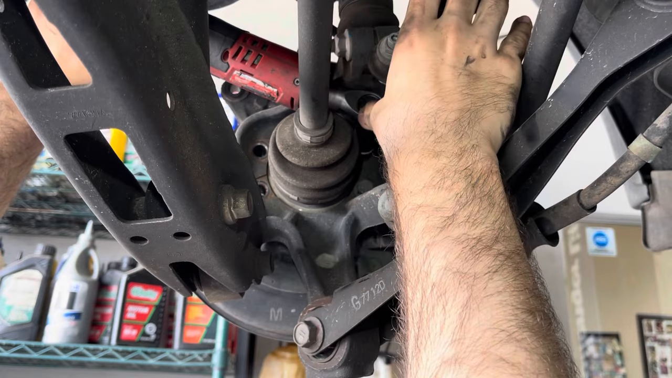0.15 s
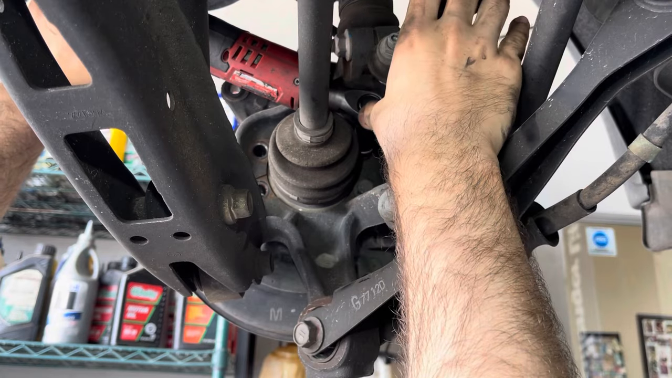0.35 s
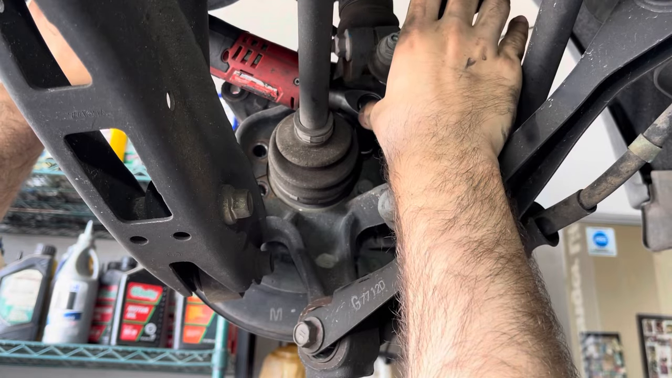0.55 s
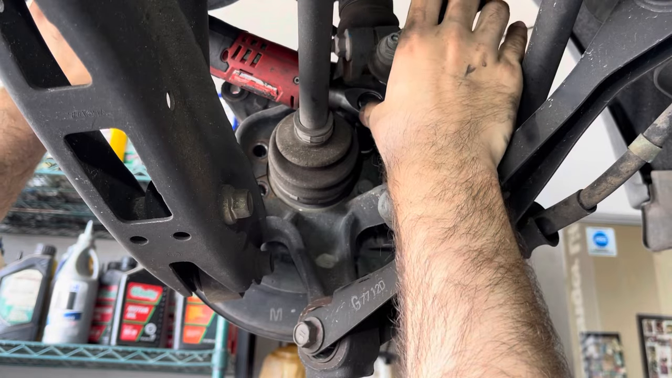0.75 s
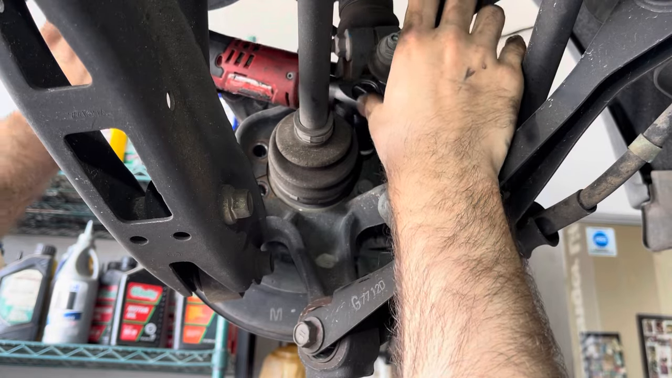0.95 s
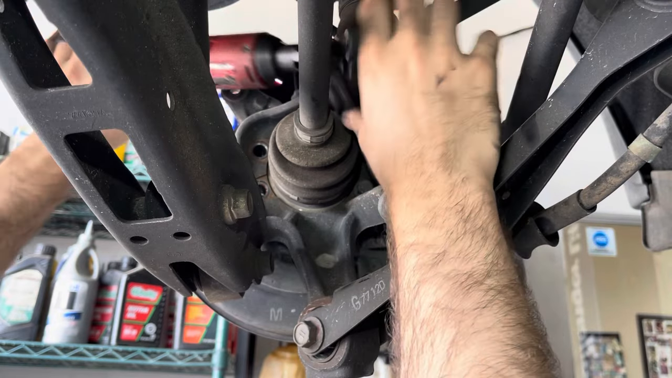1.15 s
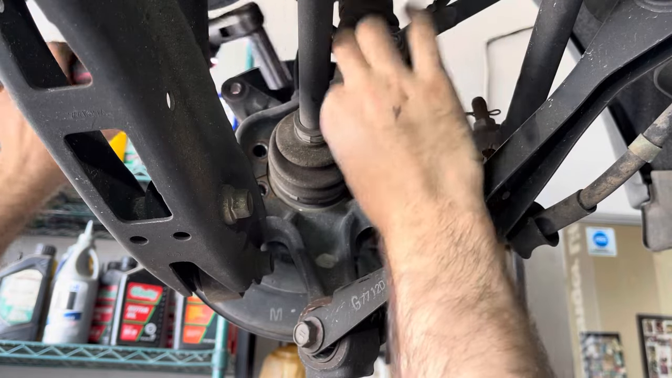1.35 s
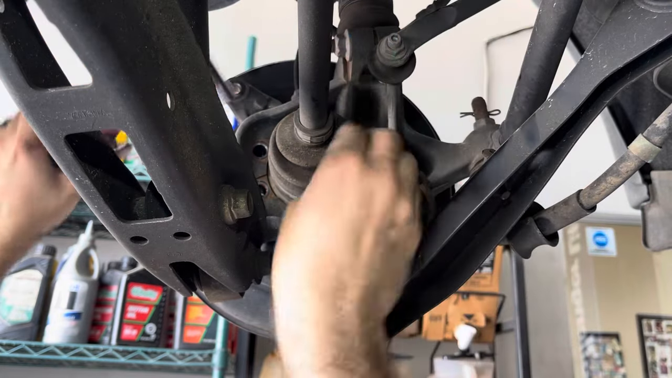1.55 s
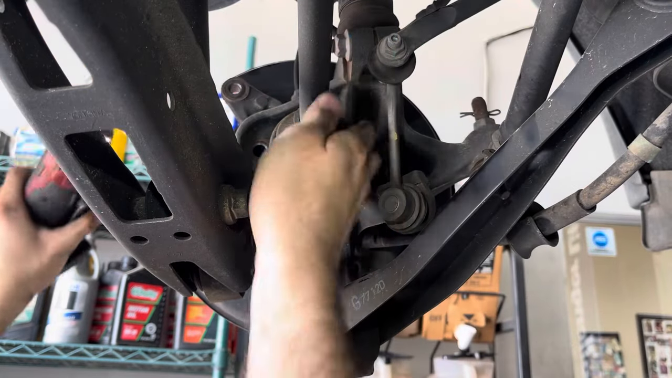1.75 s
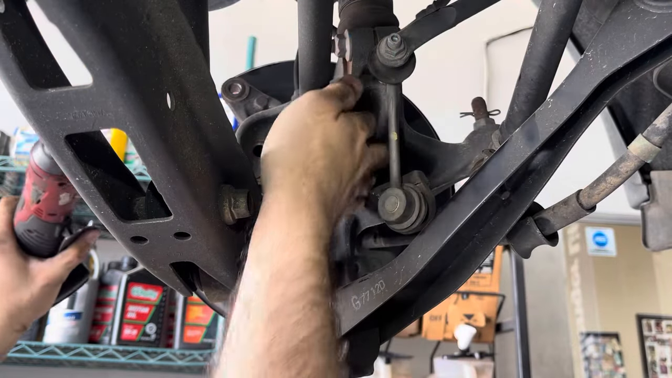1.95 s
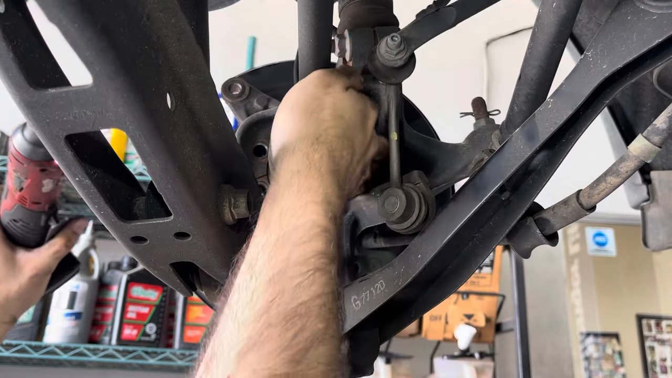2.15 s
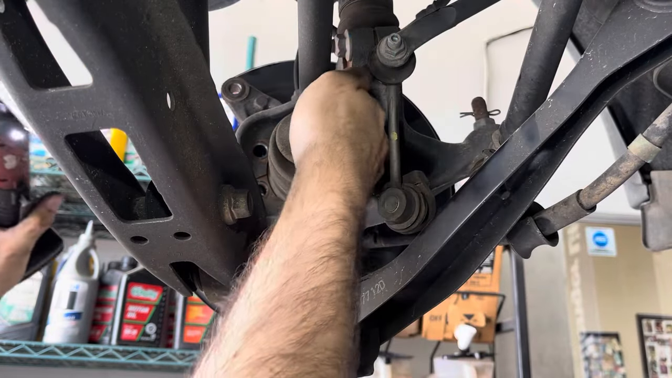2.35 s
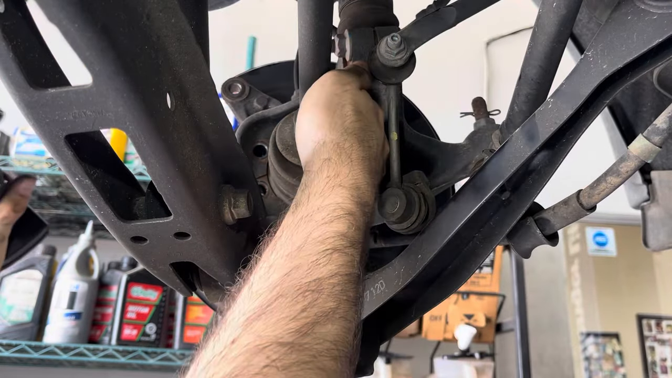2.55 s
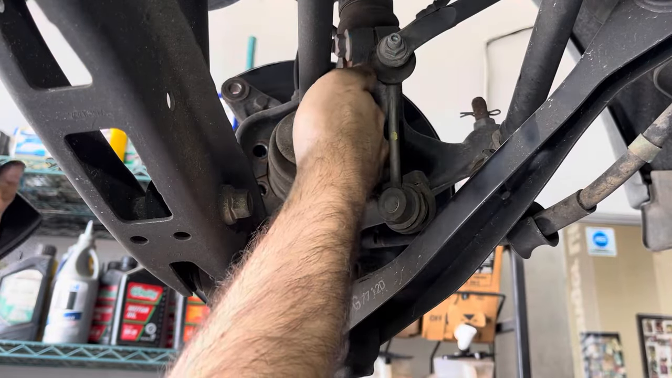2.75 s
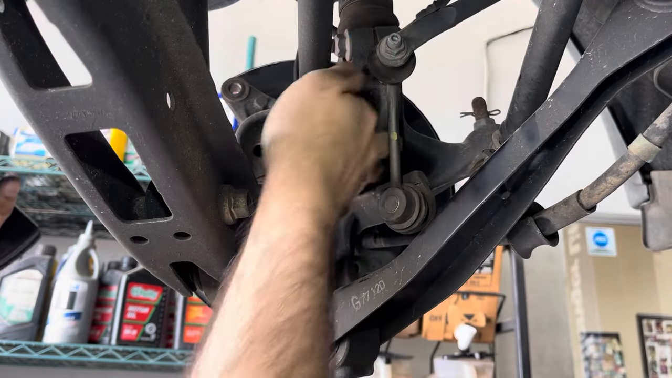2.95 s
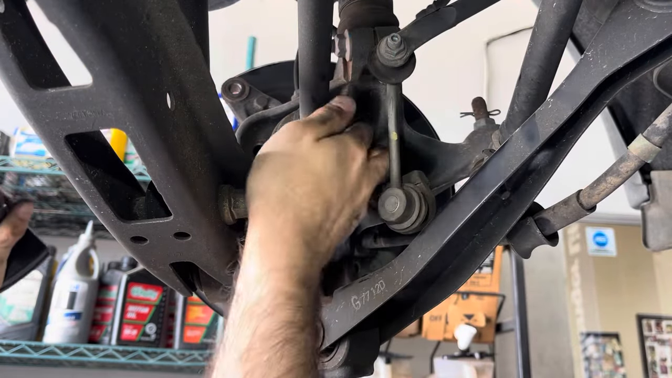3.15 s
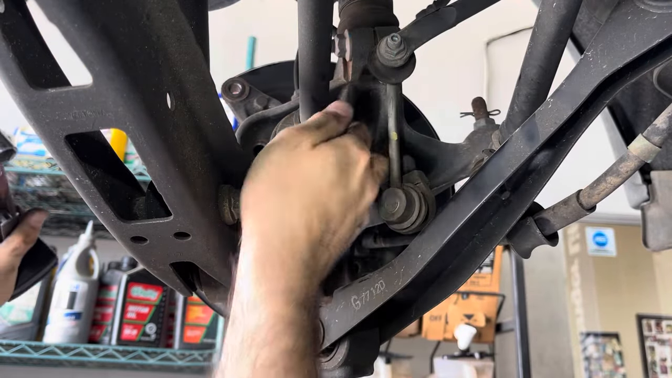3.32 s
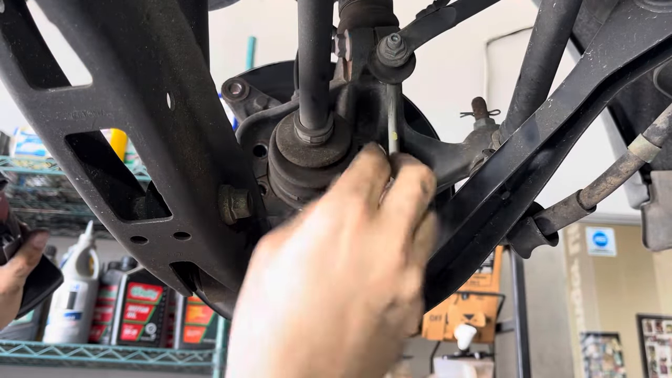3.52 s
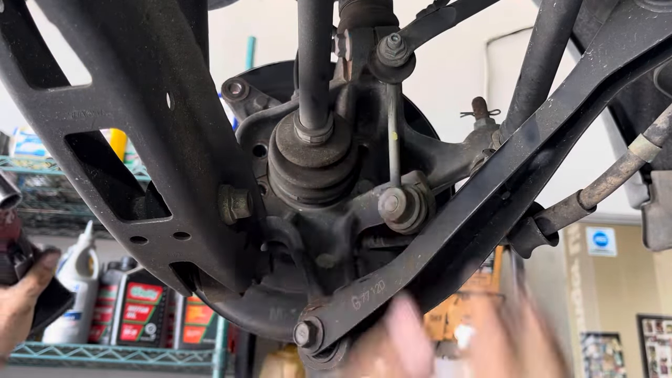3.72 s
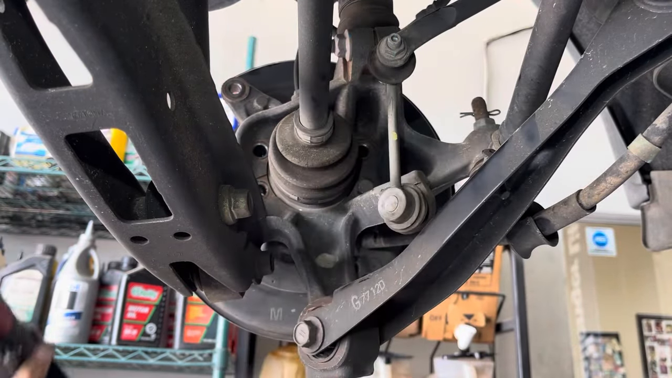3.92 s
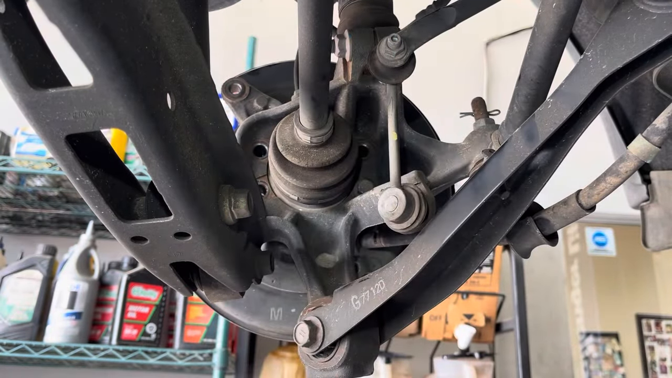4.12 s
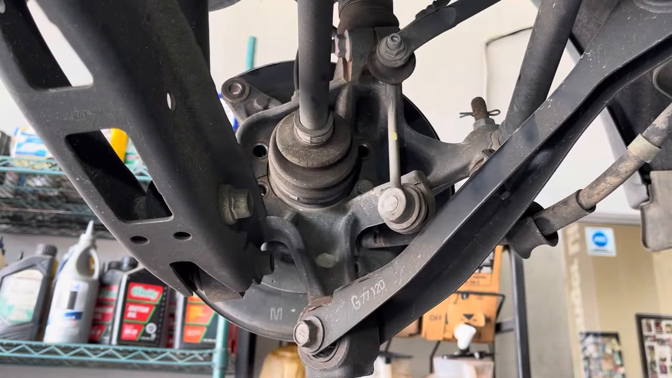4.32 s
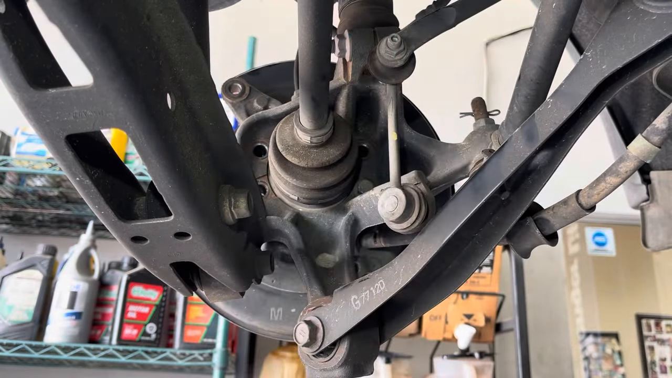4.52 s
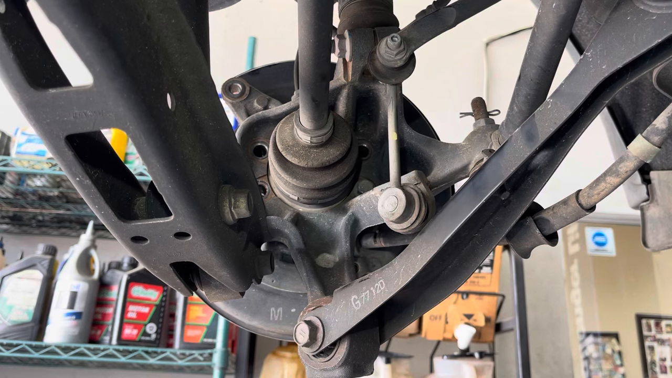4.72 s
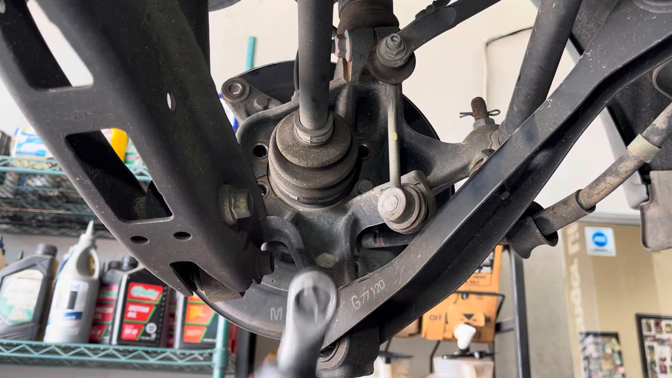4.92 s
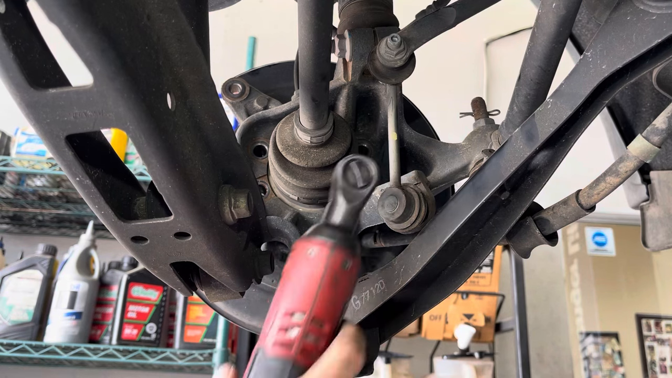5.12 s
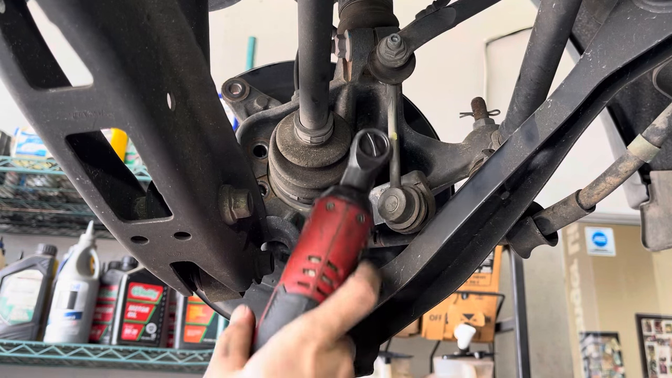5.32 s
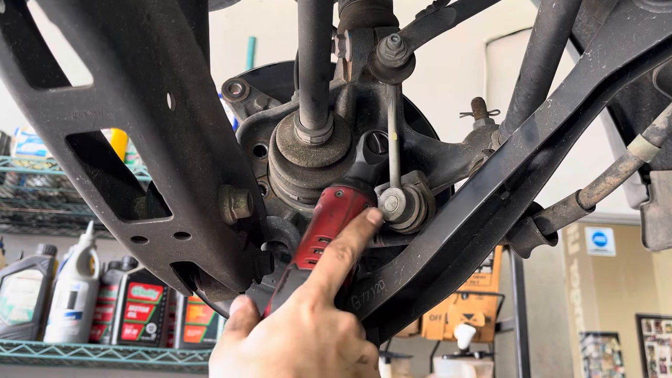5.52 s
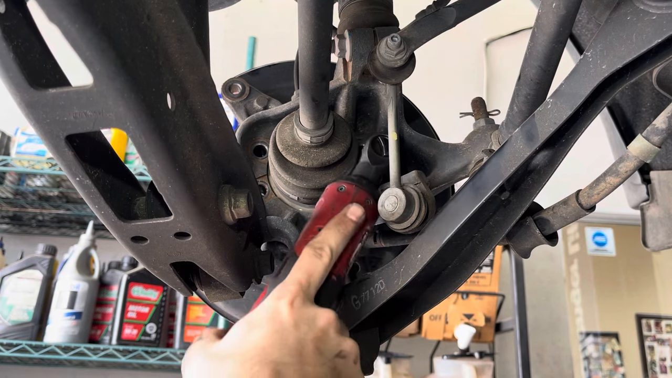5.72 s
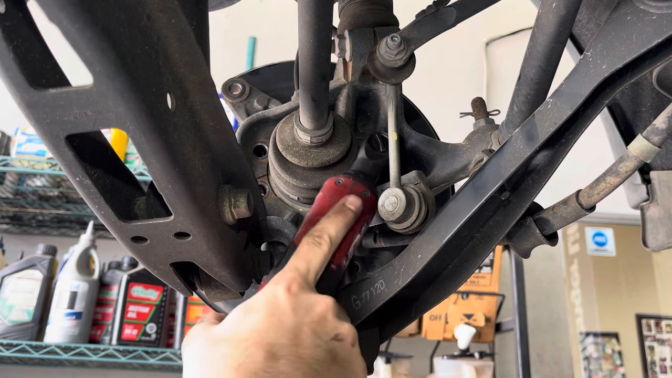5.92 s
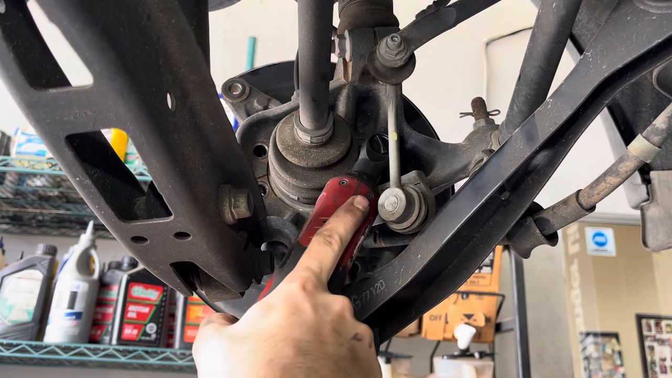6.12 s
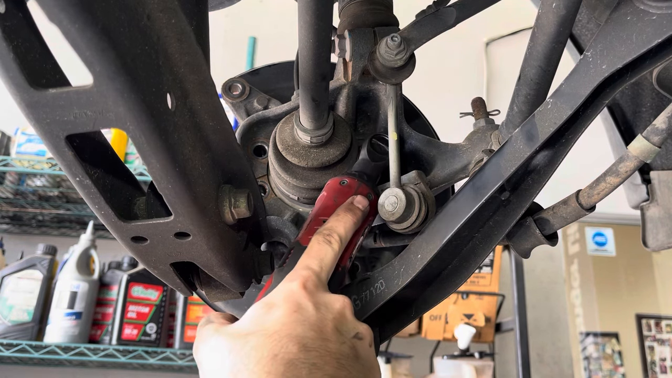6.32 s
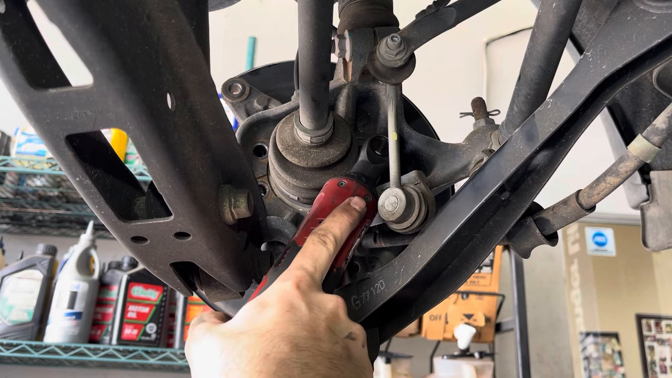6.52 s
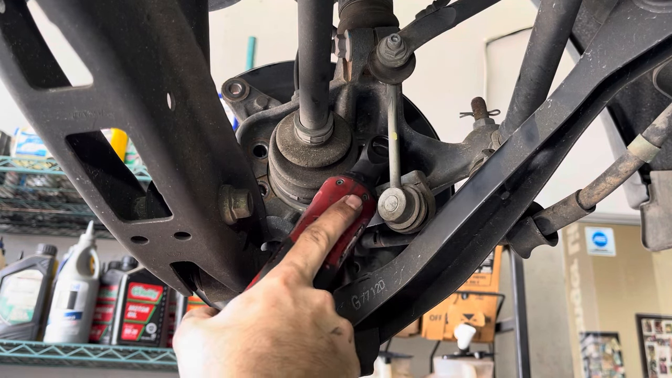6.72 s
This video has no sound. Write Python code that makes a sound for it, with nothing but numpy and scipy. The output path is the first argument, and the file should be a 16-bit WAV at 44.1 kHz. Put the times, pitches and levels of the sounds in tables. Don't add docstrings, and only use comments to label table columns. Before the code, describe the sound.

A nearby stereo microphone catches a power ratchet's bright, gritty buzz, released early and slowing tick by tick. In the quiet, small metal parts click, a bolt rings shortly, a bracket is knocked and a loose socket sings piercingly high in swells. The sound ducks for an instant; dull tool knocks come next, then the ratchet starts abruptly and runs to the end over low traffic and room hum.

```python
import sys
import numpy as np
from scipy import signal
from scipy.fft import rfft, irfft, next_fast_len
from scipy.io import wavfile
from scipy.ndimage import uniform_filter1d

SR = 44100
rng = np.random.default_rng(int(sys.argv[2]) if len(sys.argv) > 2 else 0)


def field_ratio(decibels):
    return 10 ** (np.asarray(decibels, dtype=float) / 20)


def inscribe(sig):
    pcm = np.round(np.clip(np.atleast_2d(sig).T, -1, 1) * 32767)
    wavfile.write(sys.argv[1], SR, pcm.astype(np.int16))


N = 298557

# [f/Hz, level per Hz/dB]
GEAR_SPECTRUM = [(150, -41), (250, -9), (483, -15), (527, -5), (575, -10), (934, -9.5), (1370, -13),
                 (3550, -10), (6740, -12), (9050, -1), (10200, 6.5), (11500, -1), (12800, -1.5),
                 (13700, -22.5), (15800, -19)]
# [f/Hz, width/Hz, level/dB]
HOUSING_MODES = [(947, 70, -8), (1780, 67, -6), (2298, 38, -13), (3490, 56, -6), (4025, 37, -4.5),
                 (4220, 68, -4.5), (5560, 180, -2), (9240, 420, -1)]
# [multiple of the stroke rate, level against the gear noise/dB]
MOTOR_HUM = [(1, -18.5), (1.52, -15), (2.04, -22.5), (2.97, -20), (7.05, -19.5)]
# [f/Hz, left minus right/dB]
TOOL_LEAN = [(60, 4), (180, 7), (550, -9.5), (1650, -4.5), (4970, -6), (15000, 2.5)]
# [f/Hz, likeness 0-1]
TOOL_LIKENESS = [(200, .5), (1000, .6), (4000, 0.51), (10000, 0.6)]

# [f/Hz, level per Hz/dB]
STREET_SPECTRUM = [(15, -43), (25, -15), (97, 0.5), (160, -10.5), (244, -21.5), (325, -14), (380, -26.5),
                   (563, -23.5), (925, -19.5), (1980, -32), (3330, -50.5), (5780, -52), (9500, -45.5),
                   (12000, -64), (13000, -78.5)]
# [f/Hz, left minus right/dB]
STREET_LEAN = [(60, -2), (240, -0.5), (950, -4), (3770, -8.5), (15000, 2.5)]
# [f/Hz, likeness 0-1]
STREET_LIKENESS = [(40, 0.44), (200, 0.18), (1000, 0.16), (6000, .2)]
# [t/s, rumble level/dB]
TRAFFIC = [(0, -40), (.8, -46), (1.3, -41), (1.8, -43.5), (3.05, -44), (3.5, -43.5), (4.2, -43),
           (4.7, -50.5), (4.85, -41.5), (5.37, -38), (6.3, -39.5), (6.77, -48.5)]
# [f/Hz, width/Hz, level/dB]
ROOM_HUMS = [(58, 5.1, -51), (78.4, 6.7, -54), (107.6, 11, -48.5), (117.94, 5.04, -51.5),
             (221.3, 7.8, -63.5), (288.6, 6, -60)]
# [start t/s, length/s, f/Hz, sag/Hz per s, level/dB]
ENGINE_NOTES = [(.98, .9, 333.7, 11, -56), (2.27, 0.42, 159.3, 2, -47), (2.98, 1.11, 139.9, 4, -44.5),
                (4.18, 0.454, 134, .5, -51.5), (4.85, 1.82, 135.8, 1.7, -42.5)]

STROKE_RING_DB = [-19.5, -21, -11.5, -11, -21.5, -17.5, -14, -21, -15, -15, -22, -33, -28.5, -24, -23.5,
                  -30.5]
# [t/s, tick level/dB, socket level/dB]
JOLTS = [(.598, -44, -11.5), (.6499, -46, -22), (1.258, -55, -90), (1.2645, -52, -90), (1.2864, -55, -90),
         (1.3269, -53.5, -90), (1.3404, -58, -90), (1.42, -60, -90), (1.4396, -63, -90), (6.291, -46, -90),
         (6.366, -36, -90)]

# [t/s, level/dB, brightness/dB, main ring f/Hz]
LIGHT_TICKS = [(2.6693, -63, 4, 2130), (2.9429, -40.5, 9, 4220), (3.0452, -32, 6.5, 3310),
               (3.1015, -47, 6, 4420), (3.1244, -49, -1, 4500), (3.1824, -37, 7.5, 3470),
               (3.1894, -32.5, 11, 3490), (3.2344, -48, -2, 3470), (3.2674, -53, -1, 3470),
               (3.3597, -39.5, -3, 3460), (3.866, -55.5, 21.5, 2320), (4.2039, -36, 16.5, 2930),
               (4.2083, -31, 16.5, 2930), (4.4844, -59, -6, 4150), (4.5162, -38.5, 14.5, 4200),
               (4.539, -54.5, 4, 2250), (4.6698, -59, 1.5, 2030), (4.7113, -55, 17, 4240),
               (4.766, -62, 9, 2260), (4.776, -61, 15, 4300), (6.1518, -66, 18, 2060)]
# [t/s, level/dB, brightness/dB, weight/dB, main ring f/Hz]
BUMPS = [(1.113, -35, 6, 2, 2210), (1.3644, -43.5, 14, 0, 4320), (1.9473, -49, 6.5, -5, 2210),
         (3.5477, -33, -8, 8, 3200), (5.234, -35, 10, 4.5, 2560), (5.254, -49.5, -6, 13.5, 2570),
         (5.3444, -58, -2, 15, 2010), (5.475, -48, -1.5, 1, 2070), (5.4923, -47.5, 2.5, -3.5, 2810),
         (5.6412, -38, 7.5, 7.5, 2190), (5.7835, -33, 10, 1, 2070), (5.787, -44, 0, 0.5, 4300),
         (5.936, -47.5, 4, 5, 2400), (5.9465, -39, 0, 6, 2400), (6.0637, -57.5, -1, 14, 2100)]
# [t/s, rise/s, top level/dB, loss/dB per s]
SCRAPES = [(2.79, .06, -51, 170), (3.095, .011, -49.5, 360), (3.22, .01, -58.5, 190), (4.25, .01, -54, 121),
           (5.29, .05, -66, 49)]

# [t/s, level/dB, loss/dB per s, beats per s]
SOCKET_BLOWS = [(2.815, -59, 40, 2), (2.942, -47, 250, 4.5), (3.046, -26, 74, 4.06), (3.19, -38.5, 20, 3.4),
                (3.36, -58, 150, 7.2), (3.55, -44, 60, 4.9), (3.685, -51.5, 60, 8.5), (3.76, -62.5, 10, 3),
                (3.866, -44.5, 27, 7.4), (4.205, -23, 62, 9.6)]
# [t/s, top level/dB]
PALM_TURNS = [(4.255, -26.5), (4.267, -21), (4.29, -24.5), (4.408, -30), (4.446, -31), (4.512, -26.5),
              (4.523, -19), (4.549, -22.5), (4.598, -29.5), (4.645, -39.5), (4.69, -33.5), (4.735, -36),
              (4.806, -90)]
# [t/s, peak level/dB]
SOCKET_KNOCKS = [(3.0455, -15.5), (3.1908, -31), (4.2078, -15.5), (4.2217, -15), (4.2364, -18),
                 (4.2464, -16), (4.2559, -10), (4.2744, -7.5), (4.5266, -7), (4.5265, -6), (4.7092, -21.5)]

# [f/Hz, level/dB, t60/s]
BOLT_MODES = [(2060, -6.5, 0.11), (3380, 0, 0.12), (4500, -8, 0.053)]
# [f/Hz, level/dB, t60/s]
BRACKET_MODES = [(1445, 5.5, 0.085), (2169, -16, 0.15), (2856, 1.5, 0.13), (2945, -8, 0.25),
                 (3080, -14.5, 0.25), (3359, -36, 0.25), (3830, -10, 0.1), (4081, -24, 0.14),
                 (4215, -21, 0.057), (5071, -14, 0.17), (5470, -19, 0.26), (6476, -21, 0.15)]
# [f/Hz, level/dB, t60/s]
PANEL_MODES = [(205, -3, .35), (280, 0, .4), (335, -5, .3)]
# [t/s, f/Hz, level/dB, t60/s]
SWITCH_CHIRP = (6.235, 5483, -51, .09)

PAWL_HZ = 76.6
RELEASE_S, COAST_S = .7407, .385
SOCKET_HZ = 11162
PARTS_DB = np.array([[-2.5], [1.5]])


def rms_one(x):
    return x / np.sqrt(np.mean(x ** 2) + 1e-20)


def in_time(rows):
    return np.interp(np.arange(N) / SR, *np.transpose(rows))


def at_hz(points, hz):
    return np.interp(np.log(hz), np.log(np.array(points)[:, 0]), np.array(points)[:, 1])


def drift(rate):
    r = np.exp(-80 * np.pi * rate / SR)
    slow = signal.lfilter([1], [1, -2 * r, r * r], rng.standard_normal(N // 40 + 2002))[2000:]
    return np.interp(np.arange(N) / 40, np.arange(len(slow)), rms_one(slow))


def impulses(times, sizes):
    out = np.full(N + 1, 1e-18)
    np.add.at(out, np.clip(np.round(np.asarray(times) * SR).astype(int), 0, N), sizes)
    return out[:N]


def ring(clicks, hz, t60):
    r, w = field_ratio(-60 / (t60 * SR)), 2 * np.pi * hz / SR
    return signal.lfilter([0, np.sin(w)], [1, -2 * r * np.cos(w), r * r], clicks)


def fade(clicks, t60):
    return signal.lfilter([1], [1, -field_ratio(-60 / (t60 * SR))], clicks)


def resonance(x, hz, width_hz):
    r = np.exp(-np.pi * width_hz / SR)
    feedback = [1, -2 * r * np.cos(2 * np.pi * hz / SR), r * r]
    return signal.lfilter(np.array([1, 0, -1]) * (1 - r * r) / 2, feedback, x)


def bandpass(x, low, high):
    return signal.sosfilt(signal.butter(2, [low, high], "band", fs=SR, output="sos"), x)


def bands(low, lean, like, gain, live):
    out = np.zeros((2, N))
    white = rng.standard_normal((2, 2, live.sum()))
    total = 0
    edges = low * 2 ** np.arange(0, np.log2(18000 / low), .4)
    for k, (a, b) in enumerate(zip(edges, edges[1:])):
        mid, side = bandpass(white[k % 2], a, b)
        hz = np.sqrt(a * b)
        alike = np.clip(at_hz(like, hz), 0, .99)
        half_db = at_hz(lean, hz) / 2
        pair = np.sqrt(1 + alike) * mid + np.sqrt(1 - alike) * side * np.array([[1], [-1]])
        total = total + gain(hz)[live] * field_ratio(np.array([[half_db], [-half_db]])) * pair
    out[:, live] = total
    return out


def motor():
    t = np.arange(N) / SR

    def after(s):
        return np.maximum(t - s, 0)

    restart_s = 6.24
    speed_db = -20 / np.log(10) * after(RELEASE_S) / COAST_S
    unload_db = 4.5 * (1 - np.exp(-after(RELEASE_S) / 0.044))
    halt_db = 78 * after(1.34)
    first_db = -32.5 - unload_db + 1.29 * speed_db - halt_db
    spin_up_db = -40 * np.exp(-after(restart_s) / 0.039)
    sag_db = 14.5 * after(6.56)
    second = t > restart_s
    level_db = np.where(second, -26.5 + spin_up_db - sag_db, np.where(t < 1.65, first_db, -120))
    rattle_db = np.where(second, -3 + 0.58 * spin_up_db + sag_db, 0.28 * speed_db)
    return level_db, rattle_db


def ratchet():
    level_db, rattle_db = motor()
    t = np.arange(N) / SR
    running = (t < .72) | (t > 6.28)
    strokes = (np.arange(int(N / SR * 80)) + .3) / PAWL_HZ
    chance = rng.standard_normal((len(strokes), 2))
    pawl = fade(impulses(strokes + .0006 * chance[:, 0], field_ratio(chance[:, 1])) * running, .03)
    planets = 1 + 0.091 * np.cos(6 * np.pi * PAWL_HZ * t)
    flutter = field_ratio(1.2 * drift(120) + 1.2 * drift(50) * ~running)
    throb = planets * flutter * (1 + pawl)
    rattle = field_ratio(rattle_db)

    def gain(hz):
        level = field_ratio(at_hz(GEAR_SPECTRUM, hz)) * (rattle if hz > 7000 else 1)
        return level * (1 + .13 * drift(15)) * (throb if hz > 1500 else flutter)

    hiss = bands(230, TOOL_LEAN, TOOL_LIKENESS, gain, level_db > -110)
    tooth_sizes = field_ratio(3.0 * np.minimum(rng.exponential(1, N), 3)) * rng.choice([-1, 1], N)
    teeth = (rng.random(N) < 2500 / SR) * tooth_sizes * throb
    body = 0
    for k, (hz, width, db) in enumerate(HOUSING_MODES):
        body = body + (-1) ** k * field_ratio(db) * resonance(teeth, hz, 3.0 * width) / np.sqrt(width)
    hiss = hiss + sum(.3 * resonance(hiss, hz, 2.5 * width) for hz, width, db in HOUSING_MODES[:-1])
    middle = bandpass(hiss[:, :SR // 2], 1500, 7000)
    hiss = hiss / np.sqrt(np.mean(middle ** 2))
    hum = 0
    for multiple, db in MOTOR_HUM:
        phase = 2 * np.pi * multiple * (PAWL_HZ - 1.5) * t + np.array([[.9], [-.9]])
        hum = hum + field_ratio(db + 3.0 * drift(8)) * np.sin(phase)
    return field_ratio(level_db + 2.5) * (hiss + field_ratio(-8.5) * rms_one(body) + running * hum)


def street():
    rumble_db = in_time(TRAFFIC)
    rumble_db = rumble_db - np.median(rumble_db)
    rumble, hiss = field_ratio(rumble_db), field_ratio(0.36 * rumble_db)

    def gain(hz):
        passing = rumble if hz < 300 else hiss if hz < 3000 else 1
        return field_ratio(at_hz(STREET_SPECTRUM, hz)) * passing * (1 + .13 * drift(3))

    out = field_ratio(-19.5) * bands(25.0, STREET_LEAN, STREET_LIKENESS, gain, np.ones(N, bool))
    for hz, width_hz, db in ROOM_HUMS:
        white = rng.standard_normal((2, N))
        hum = rms_one(resonance(resonance(white, hz, width_hz), hz, width_hz))
        out += field_ratio(db + 2.5 * drift(1.5)) * hum
    wobble = field_ratio(2.9 * drift(4.0))
    for start, length, hz, sag_hz, db in ENGINE_NOTES:
        at = slice(int((start - .1) * SR), int((start + length + .1) * SR))
        age = np.arange(N)[at] / SR - start
        phase = 2 * np.pi * (hz * age - sag_hz * age ** 2 / 2)
        swell = field_ratio(db + 3) * wobble[at] * (age > 0) * (age < length)
        out[:, at] += uniform_filter1d(swell, size=4000) * np.sin(phase + np.array([[.5], [-.5]]))
    return out


def strokes_heard():
    n = np.arange(-3, 22)
    after = -COAST_S * np.log(np.maximum(1 - np.maximum(n, 0) / (PAWL_HZ * COAST_S), 1e-3))
    s = RELEASE_S + np.minimum(n, 0) / PAWL_HZ + after
    loaded_db = 13.5 * np.exp(-after / .08 + .4 * np.minimum(n + 1, 0))
    tick_db = -50 + loaded_db - 3.0 * after + 2.0 * rng.standard_normal(len(n))
    socket_db = np.r_[STROKE_RING_DB, np.full(len(n) - len(STROKE_RING_DB), -90)]
    return np.c_[[s, tick_db, socket_db], np.transpose(JOLTS)]


def coasting():
    s, tick_db, socket_db = strokes_heard()
    white = rng.standard_normal((2, N))
    high = 0.87 * resonance(resonance(white[0], 10000, 2700), 8800, 3000)
    high = high + 1.8 * resonance(resonance(white[1], 12500, 2600), 12500, 2600)
    mid = bandpass(white[1], 2500, 7000)
    ticks = high * fade(fade(impulses(s, field_ratio(tick_db)), 0.0044), 0.027)
    knock_db = tick_db + 8 + 3.0 * rng.standard_normal(len(s))
    knocks = mid * fade(impulses(s, field_ratio(knock_db)), .06)
    strike = impulses(s, field_ratio(socket_db - 23.5))
    swell = 0
    for off_hz, t60 in ((-61.5, 0.028), (76.0, 0.048)):
        hz = SOCKET_HZ + off_hz
        swell = swell + ring(ring(strike, hz, 0.0098), hz, t60)
    return ticks + knocks + swell


def clicks():
    light = [(*row[:3], -9, row[3]) for row in LIGHT_TICKS]
    s, mid_db, bright_db, weight_db, ring_hz = np.transpose(light + BUMPS)
    high_db, low_db = mid_db + bright_db, mid_db + weight_db
    thump_db = low_db - 9
    shapes, parts = np.zeros((4, N)), np.zeros(N)
    t = np.arange(SR // 3) / SR
    short = t[:SR // 8]
    chance = rng.random((len(s), 3, 6))
    shape = field_ratio(-60 * t / 0.012) + 0.4 * field_ratio(-60 * t / .11) + 0.027 * field_ratio(-60 * t / .5)
    shape = shape * np.ones((4, 1))
    shape[0] = (1 - field_ratio(-60 * t / 0.023)) * field_ratio(-60 * t / .25)
    shape[3] *= field_ratio(-60 * t / .6)
    for row, at in enumerate((s * SR).astype(int)):
        levels_db = [thump_db[row] - 1.5, low_db[row] - 0.5, mid_db[row], high_db[row] - 6.5]
        shapes[:, at:at + len(t)] += field_ratio(np.array(levels_db))[:, None] * shape[:, :N - at]
        hz, decay = 1200 * 4.0 ** chance[row, 0], .03 + .045 * chance[row, 1]
        size = field_ratio(mid_db[row] - 5.5 - 10 * chance[row, 2])
        hz[0], decay[0], size[0] = ring_hz[row], .075, field_ratio(mid_db[row] - 3)
        modes = np.sin(2 * np.pi * hz[:, None] * short) * field_ratio(-60 * short / decay[:, None])
        parts[at:at + len(short)] += size @ modes
    shapes[2:] += scraping() * [[.8], [.6]]
    width_db = 10 * np.log10(SR / 2 / np.array([520, 1500, 3300, 4500]))

    def gain(hz):
        band = np.digitize(hz, [700, 2200, 5500])
        top_db = 3.0 * (hz > 7500) - 22.0 * max(np.log2(hz / 10000), 0)
        bass_db = -2.4 * np.log2(hz / 450) * (hz < 700)
        return shapes[band] * field_ratio(width_db[band] - 5 + top_db + bass_db)

    cracks = bands(130, TOOL_LEAN, [(300, 0.76), (10000, 0.8)], gain, shapes[2] > 0)
    return cracks + parts * field_ratio(PARTS_DB)


def scraping():
    now = np.arange(N) / SR
    strength = 0
    for at, rise, db, loss_db in SCRAPES:
        level = field_ratio(db - loss_db * np.maximum(now - at - rise, 0))
        strength = strength + np.clip((now - at) / rise, 0, 1) * level * (now < at + .3)
    return uniform_filter1d(strength, size=300) * field_ratio(2.5 * drift(60))


def singing():
    age, out = np.arange(SR // 2) / SR, np.full(N, 1e-6)
    for s, db, loss_db, beats in SOCKET_BLOWS:
        beating = .06 + np.abs(np.cos(np.pi * beats * age))
        out[int(s * SR):][:len(age)] = field_ratio(db - loss_db * age) * beating
    for (s, db), (end, _) in zip(PALM_TURNS, PALM_TURNS[1:]):
        share = np.minimum(age / (end - s), .9999)
        arch = .07 + np.sin(np.pi * share ** .8) ** .8
        out[int(s * SR):][:len(age)] = field_ratio(db) * arch * (age < end - s)
    return 20 * np.log10(out + 1e-6)


def socket():
    level_db = singing()
    envelope = uniform_filter1d(field_ratio(level_db + 9), size=60)
    note = np.sin(2 * np.pi * np.cumsum(SOCKET_HZ + 12 * drift(15)) / SR)
    white = rng.standard_normal(N)
    near = rms_one(resonance(resonance(white, SOCKET_HZ, 90), SOCKET_HZ, 90))
    wide = resonance(resonance(white, SOCKET_HZ, 900), SOCKET_HZ, 900)
    wide = rms_one(resonance(wide, SOCKET_HZ, 900))
    rough = np.clip((-30 - level_db) / 18, .02, .9)
    s, peak_db = np.transpose(SOCKET_KNOCKS)
    splash = fade(fade(impulses(s, field_ratio(peak_db - 47)), .02), .03)
    song = envelope * (np.sqrt(1 - rough) * note + 0.77 * np.sqrt(rough) * near)
    return song + splash * (.7 * note + .4 * wide)


def struck_parts():
    chirp_s, chirp_hz, chirp_db, chirp_t60 = SWITCH_CHIRP
    # modes, time in s, blow in dB
    blows = [(BOLT_MODES, 3.19, -34.5), (BRACKET_MODES, 3.548, -29), (PANEL_MODES, 5.25, -42),
             ([(chirp_hz, 0, chirp_t60)], chirp_s, chirp_db)]
    rings = 0
    for modes, when, blow_db in blows:
        for hz, db, t60 in modes:
            rings = rings + ring(impulses([when], [field_ratio(blow_db + db)]), hz, t60)
    return rings * field_ratio(PARTS_DB)


def scene():
    mix = ratchet() + street() + coasting() + clicks() + socket() + struck_parts()
    t = np.arange(N) / SR
    dip = np.clip(np.abs(t - 4.806) / 0.031, .03, 1)
    return mix * np.clip(np.arange(N) / 60, 0, 1) * dip


def low_pass(x):
    return signal.sosfilt(signal.butter(12, 15920, fs=SR, output="sos"), x)


def record(dry):
    x = np.stack([np.roll(dry[0], 1), dry[1]])
    for depth in (.95, .8):
        x = x - depth * resonance(x, 10330, 600)
    x = signal.sosfilt(signal.butter(3, 38, "high", fs=SR, output="sos"), x)
    size = next_fast_len(N + 4096, True)
    spectrum, hz = rfft(x, size), np.arange(size // 2 + 1) * SR / size

    def above(edge_hz):
        return np.clip((hz - edge_hz) / 240 + .5, 0, 1)

    def band(low, high):
        return irfft(spectrum * (above(low) - above(high)), size)[:, :N]

    def power(part):
        return uniform_filter1d(np.sum(part ** 2, axis=0), size=700)

    spectrum -= above(11800) * .25 * (spectrum[0] - spectrum[1]) * np.array([[1], [-1]])
    note = band(10800, 11600)
    out = band(-500, 8500) + note
    for low, high in ((8500, 9700), (9700, 10800), (11600, 12200), (12200, 13300)):
        part = band(low, high)
        kept = power(part) > field_ratio(-64) * power(note) + field_ratio(-166)
        out += uniform_filter1d(kept * 1., size=300) * part
    for low, high, rarity in ((13300, 14500, .9), (14500, 15750, .3)):
        part = band(low, high)
        patches = np.repeat(rng.standard_normal(N // 1024 + 1) > rarity, 1024)[:N]
        kept = patches & (power(part) > field_ratio(-50) * power(note) + field_ratio(-150))
        out += field_ratio(-4.5) * uniform_filter1d(kept * 1., size=300) * part
    return low_pass(out)


dry = scene()
out = record(dry)
inscribe(out)
```